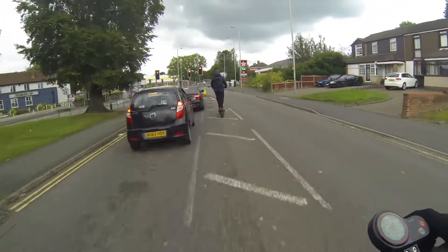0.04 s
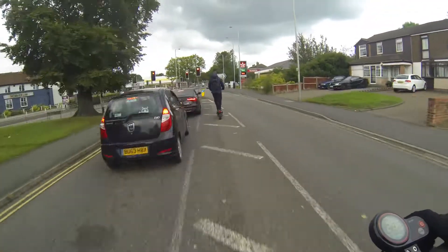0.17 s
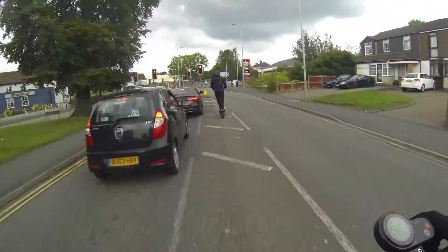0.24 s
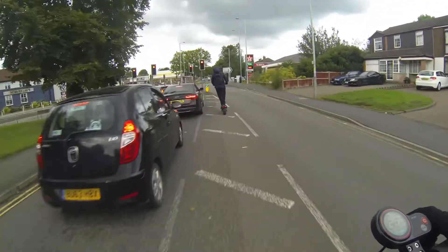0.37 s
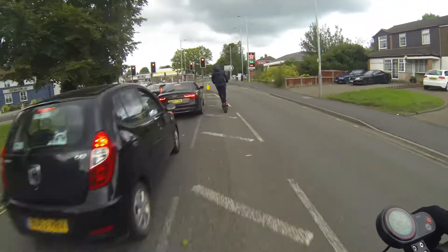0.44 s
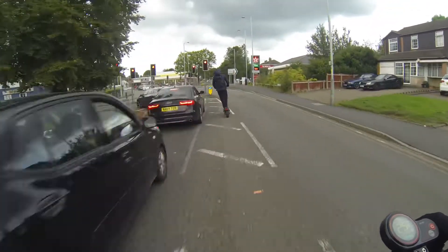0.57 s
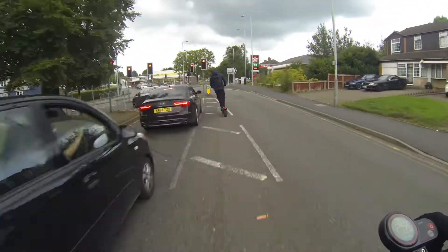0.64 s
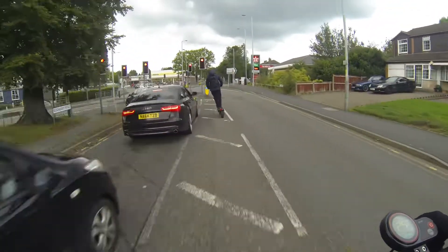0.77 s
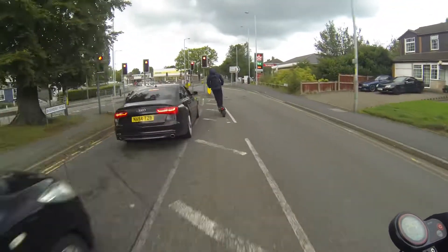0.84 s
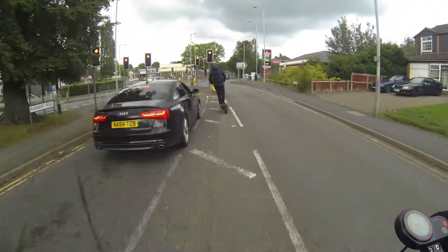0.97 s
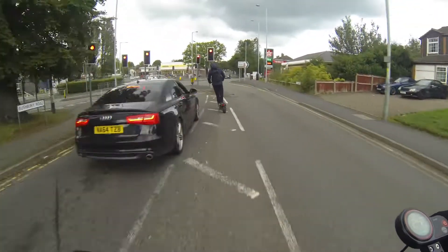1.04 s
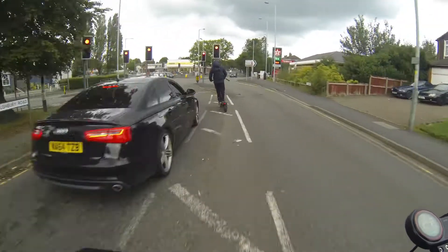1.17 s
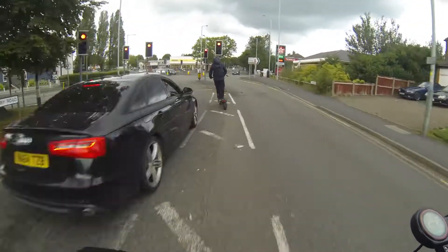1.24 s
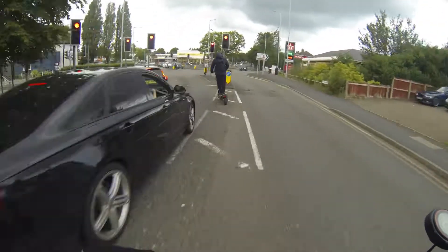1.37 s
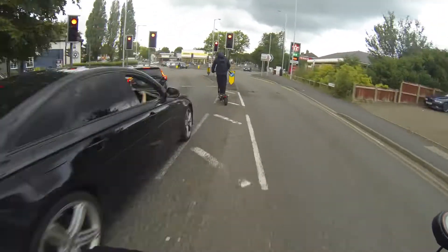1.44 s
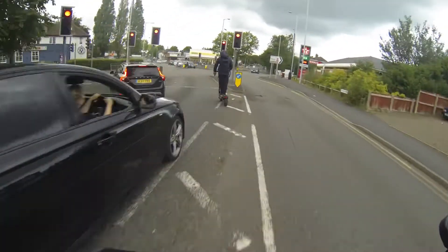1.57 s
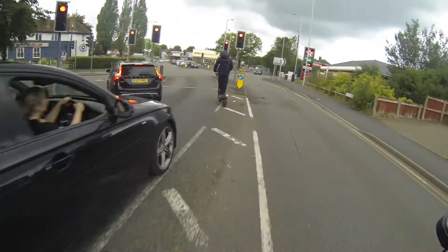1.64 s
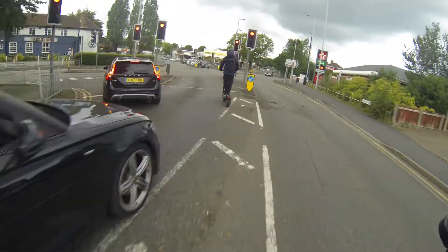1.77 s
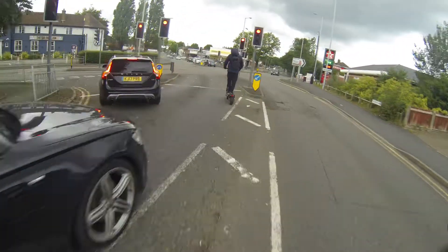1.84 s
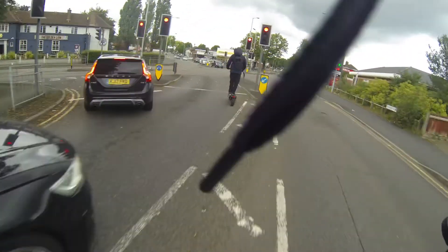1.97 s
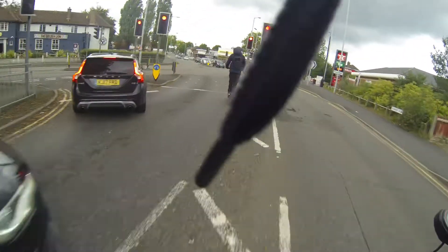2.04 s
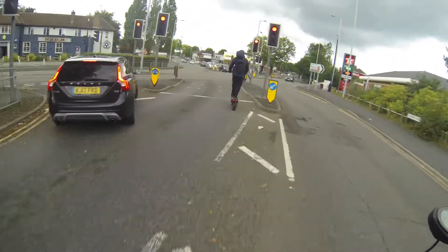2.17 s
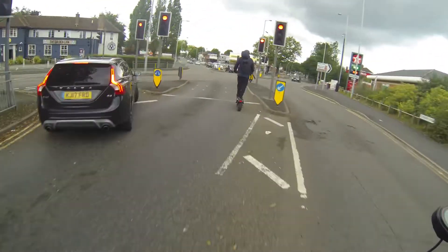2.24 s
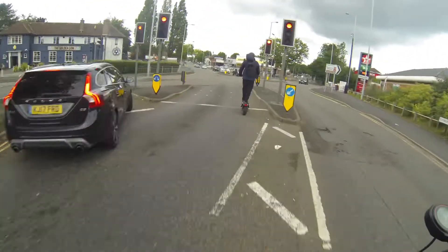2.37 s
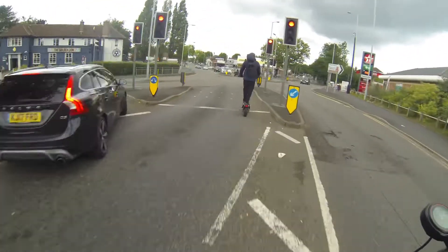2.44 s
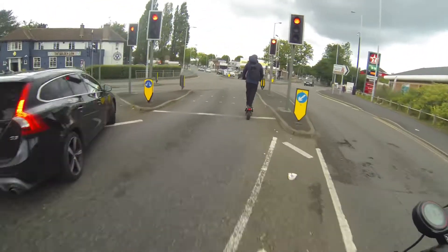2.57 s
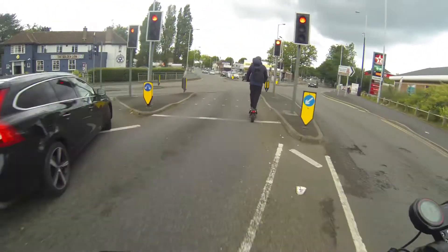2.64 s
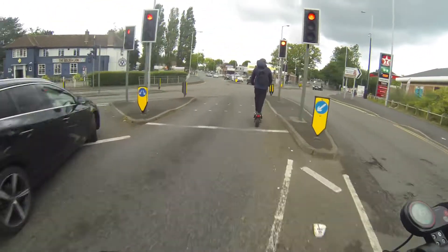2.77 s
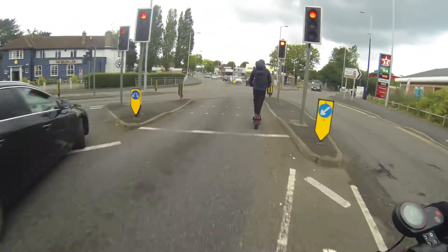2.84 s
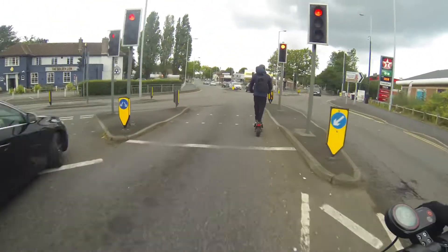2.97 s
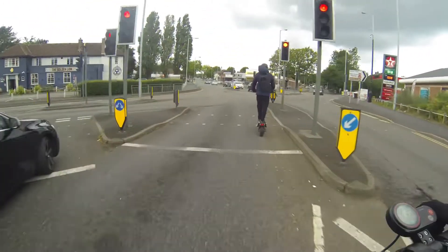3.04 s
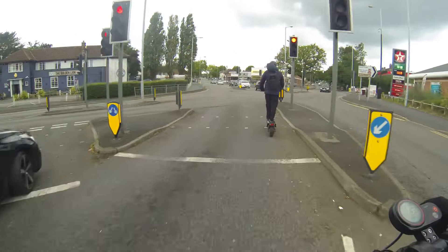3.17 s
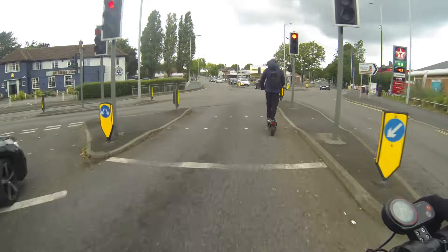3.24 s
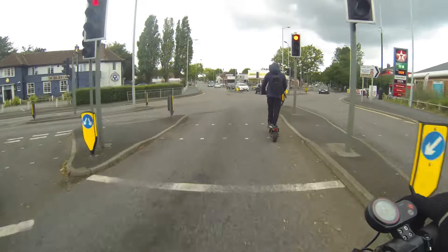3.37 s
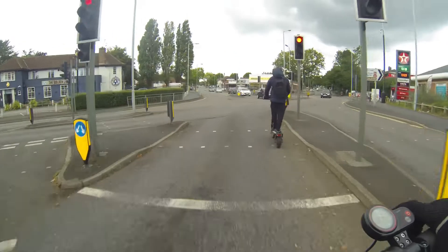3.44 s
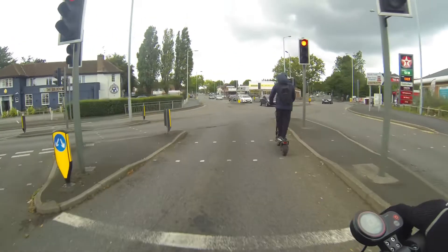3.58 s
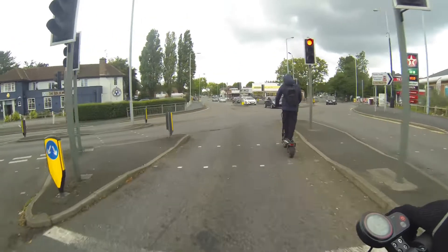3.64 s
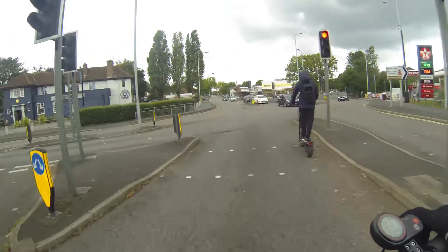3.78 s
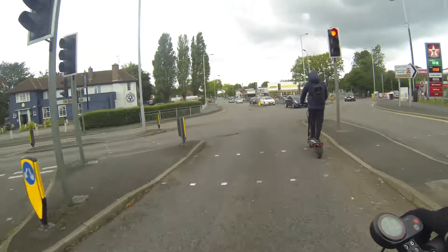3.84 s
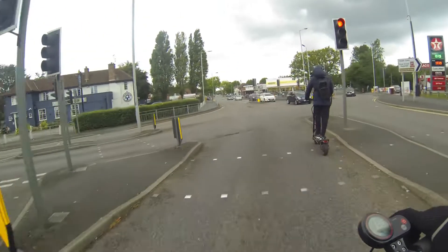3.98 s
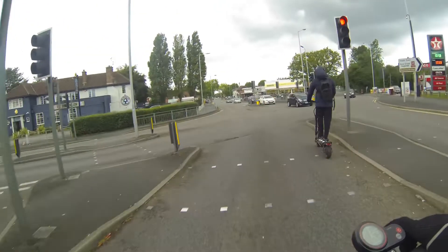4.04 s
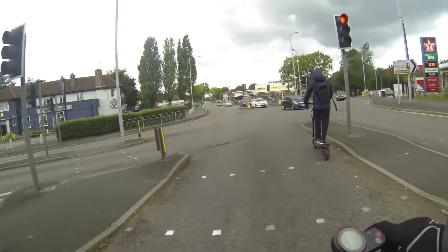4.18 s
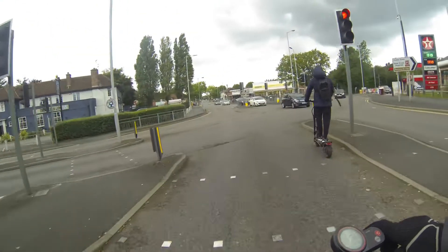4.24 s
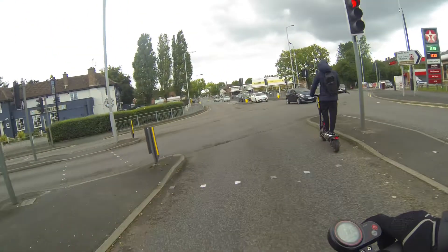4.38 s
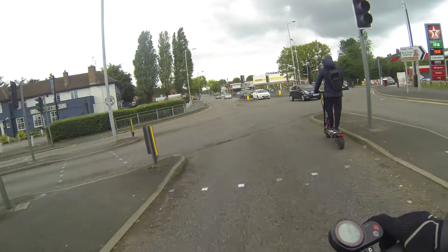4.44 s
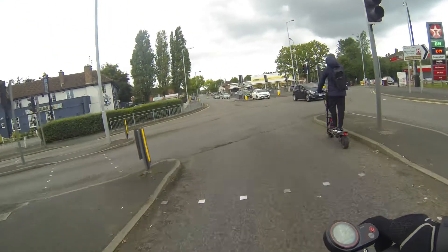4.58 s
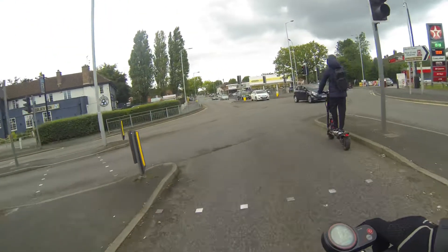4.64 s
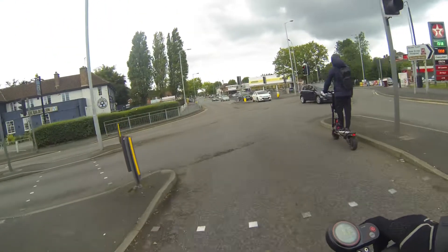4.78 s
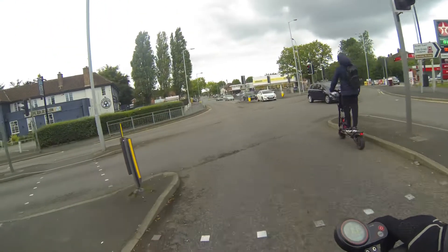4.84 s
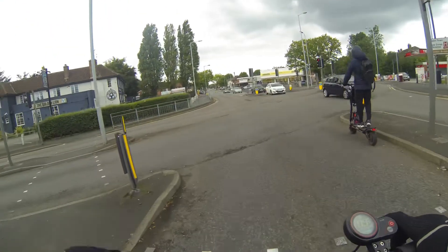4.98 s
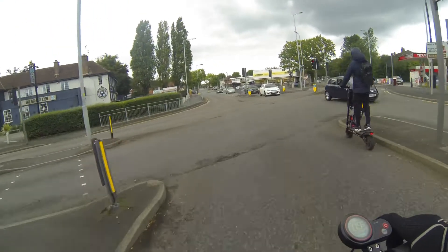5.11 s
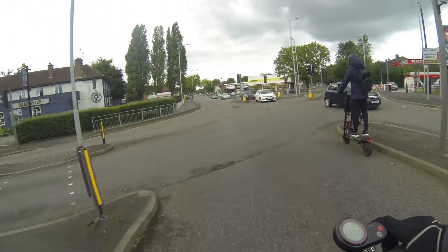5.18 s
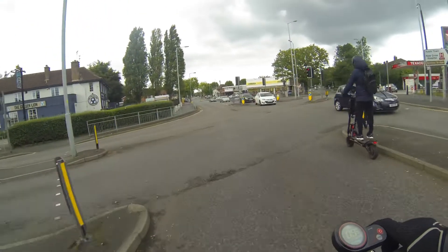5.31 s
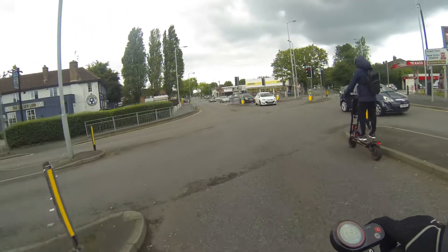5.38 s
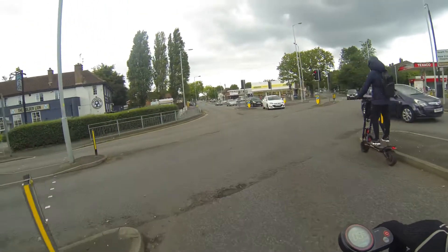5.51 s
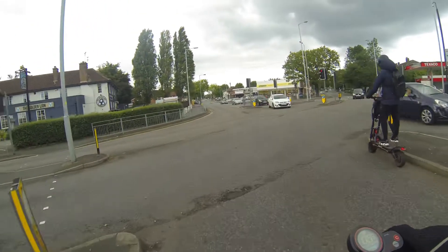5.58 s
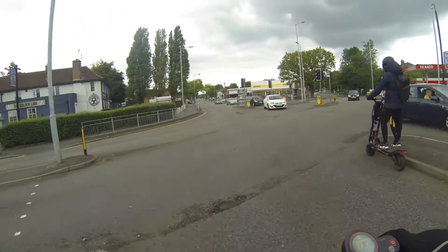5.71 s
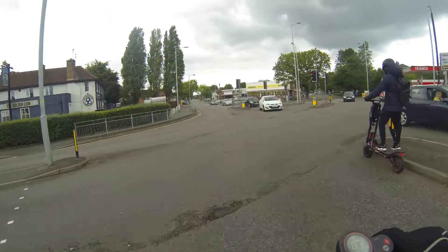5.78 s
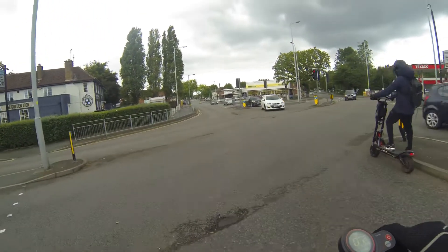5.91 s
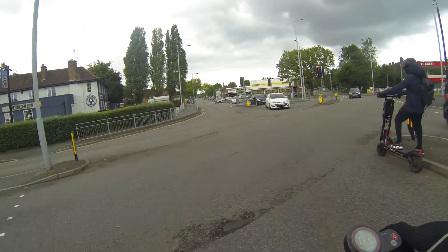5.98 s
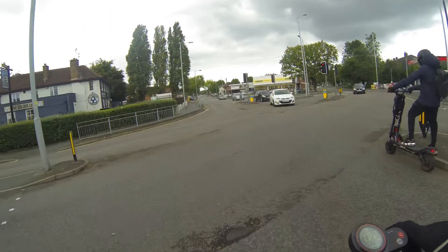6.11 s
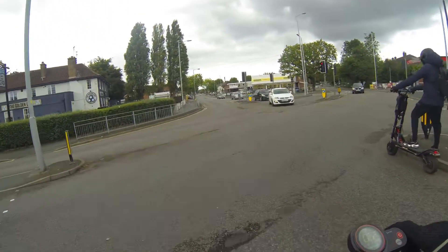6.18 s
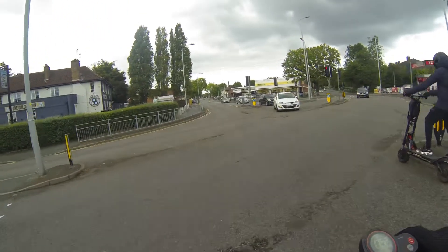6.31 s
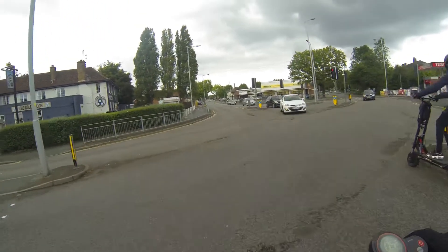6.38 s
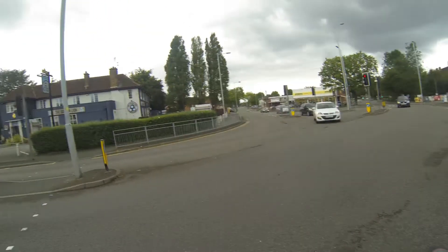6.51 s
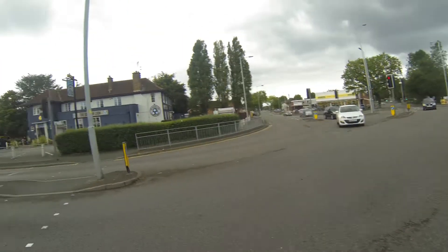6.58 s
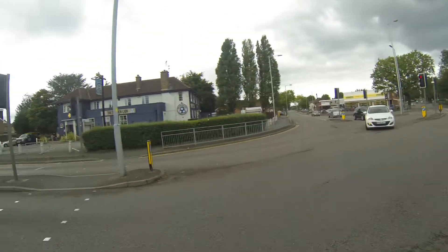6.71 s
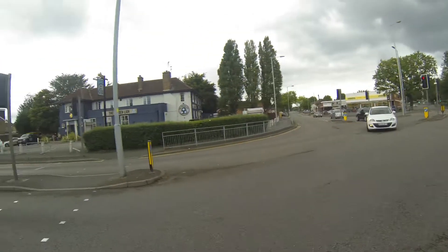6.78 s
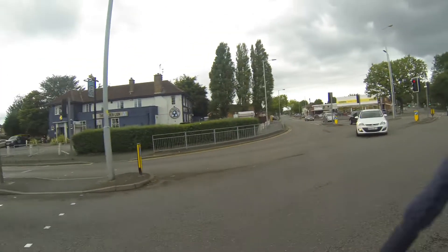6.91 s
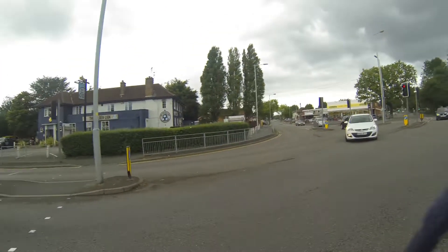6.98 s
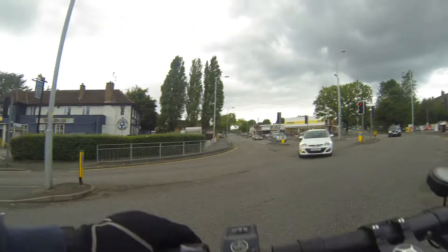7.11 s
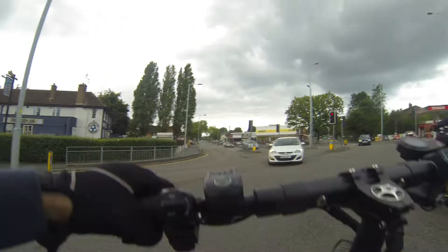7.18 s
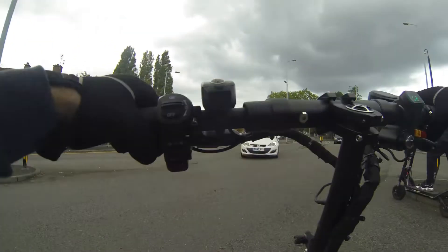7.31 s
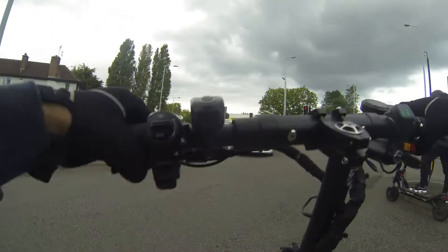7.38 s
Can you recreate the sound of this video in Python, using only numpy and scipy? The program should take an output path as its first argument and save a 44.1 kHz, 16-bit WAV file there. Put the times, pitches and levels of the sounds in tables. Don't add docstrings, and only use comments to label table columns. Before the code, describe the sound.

Outdoors on a road, heard through a closed camera case on a rider's helmet: loud resonant wind first, with hollow plastic pings and low gusts, then a quieter ride as the scooter slows. Grit ticks, bumps thump the mount, cars pass as soft muffled hiss and a thin electronic whistle sits underneath. A sudden burst of rubbing, snapping and heavy knocking closes it.

```python
import sys
import numpy as np
from scipy import signal
from scipy.fft import rfft, irfft, next_fast_len
from scipy.io import wavfile
from scipy.ndimage import uniform_filter1d, map_coordinates

SR = 44100
rng = np.random.default_rng(int(sys.argv[2]) if len(sys.argv) > 2 else 0)


def natural_amplitude(level_db):
    exponent = np.asarray(level_db, float) / 20
    return 10 ** exponent


def unload_audio(sound):
    columns = np.transpose(np.atleast_2d(sound))
    steps = np.round(np.clip(columns, -1, 1) * 32767)
    wavfile.write(sys.argv[1], SR, steps.astype(np.int16))


N = 328104

# [f/Hz, level/dB per Hz]
CIRCUIT_COLOUR = [(2200, -8), (3800, 0.5), (6500, -4), (8000, -14.5), (9200, -7.5), (13300, -6),
                  (13600, -19), (14500, -18), (15200, -28)]
# [overtone of 1 kHz, level/dB rms]
CLOCK_LINES = [(3, -81.5), (4, -100), (8, -110), (11, -113), (12, -106), (13, -104)]
# [start t/s, end t/s, level/dB]
SENSOR_READS = [
    (0, .0170, -68.5),
    (0.0189, 0.036, -67),
]
FRAME_PAIRS_PER_S, FIRST_READ_S = 14.984, .0143

# [f/Hz, width/Hz, level/dB]
SHELL_MODES = [(2370, 850, -8.5), (2614, 106, 2), (3060, 330, -1), (3374, 133, 1.5), (3560, 900, -9),
               (4930, 1100, -15.5), (7000, 1800, -19.5)]
# [t/s, level/dB]
ROLLING_LEVEL = [
    (0, 0.5),
    (3.3, 1),
    (3.8, -2),
    (4.9, -5),
    (5.7, -4),
    (6.5, -5.5),
    (7.44, -3.5),
]
# [t/s, half length/s, hiss rise level/dB, drone rise level/dB]
PASSING_CARS = [
    (0, 0.43, -0.5, 9),
    (.75, 0.19, 1.5, 4.5),
    (1.85, 0.4, 4.5, 3),
    (3.9, 0.54, -0.5, 3),
    (5.8, 0.23, 0.5, 5.5),
    (6.5, 0.37, 1, 5.5),
    (7.44, 0.2, -1, 9.5),
]
HISS_DB, SIZZLE_DB, FAR_DB = -68, -78.5, -69
HISS_FOLLOWS = 0.32
SWISH_S, SWISH_HALF_S, SWISH_DB = 5.6, 0.4, -71.5

# [t/s, peak level/dB, low mode level/dB]
TICK_HITS = [(.6709, -55, 0), (.845, -57, 9), (1.0774, -55, -1), (1.217, -56, 0), (1.8687, -51, -1),
             (2.0637, -54, 6), (2.1141, -50.5, 6), (2.211, -49, -4), (2.794, -49.5, -5), (3.0664, -57, -1),
             (3.1334, -62, 2), (3.1712, -55, 0), (3.4471, -54, 2), (3.8232, -53, 9), (3.893, -58, 0),
             (3.899, -49, -2), (3.906, -55, -2), (4.127, -55.5, -4), (4.254, -53, 1), (4.6453, -55, 2),
             (4.6733, -56, -1), (7.08, -66, 3), (7.2694, -54, -4), (7.2868, -59, 8), (7.314, -56, 2),
             (7.34, -56, 6)]
# [f/Hz, width/Hz, level/dB, group: whole part picks from (fixed, top, low), negative from the end]
BUCKLE_MODES = [(4200, 1700, -8.5, -2), (6170, 1500, -9, -1), (8100, 1100, 9, 1.5), (10300, 1200, 4, 1),
                (12700, 1700, -8, 1), (3420, 260, 8.5, 2.2)]
TICK_T60_S, TICK_HZ = 0.031, 4900
TOP_DB, TOP_DULLS = -11.5, 0.61

# [t/s, peak level/dB, rise/s, fall/s]
STRAP_STROKES = [
    (7.002, -47.5, .1, 0.065),
    (7.076, -36, .004, .012),
    (7.16, -39.5, 0.085, 0.14),
    (7.289, -30.5, 0.023, 0.011),
    (7.4, -42, 0.26, 0.26),
    (6.45, -54.5, 0.39, 0.37),
    (6.65, -56, 0.26, 0.37),
]
RUB_SPAN_DB = 27
# [t/s, peak level/dB, t60/s]
CLASP_SNAPS = [
    (6.987, -44, .04),
    (7.103, -36, 0.025),
    (7.15, -41.5, 0.032),
]
# [f/Hz, width/Hz, level/dB]
CLASP_MODES = [(3270, 1000, 0.5), (5130, 400, 3), (5760, 500, 0), (6550, 250, -3), (7800, 400, -7),
               (8600, 500, -8), (10300, 1100, -13), (12500, 2500, -24)]

# [t/s, peak level/dB, low, middle, upper modes level/dB]
CASE_KNOCKS = [(2.2269, -48, 9, -12, -19), (3.0006, -42, -4, -17, -24), (3.899, -44, -9, -11, -13),
               (4.9447, -42, 1, -1.5, -15), (5.0311, -35, 4.5, 7.5, -13), (5.0404, -55, 5, -5, -7),
               (7.02, -45, 1, -16, -20), (7.075, -37.5, 3.5, -1, 0.5), (7.1042, -37.5, -2.5, -14, -6),
               (7.283, -25.5, 5.5, -2, -16), (7.2908, -52, 10, -13, -7), (7.3404, -16.5, -3, -8.5, -19),
               (7.3845, -26.5, 4, -1.5, -25)]
# [t/s, peak level/dB, note f/Hz]
DOOR_PINGS = [(0.2453, -28, 1384), (1.1652, -32, 1410), (1.2034, -32.5, 1400), (1.4399, -32.5, 1430),
              (2.0963, -45, 1430), (2.187, -33, 1375), (2.353, -35.5, 1350), (2.4114, -37.5, 1470),
              (2.4847, -41, 1350), (4.1984, -40, 1440), (5.0313, -33, 1370)]
# [low, middle, upper level/dB]
PING_WALLS = (-20.5, -45, -34)
# [f/Hz, level/dB, relative t60, group 0 low, 1 middle, 2 upper]
CASE_MODES = [(220, 0, 1.7, 0), (330, -5, 1.1, 0), (430, -5, 1.1, 0), (640, 0, 1.3, 1), (760, 0, 1.1, 1),
              (1000, -12, .7, 1), (1900, 0, .6, 2), (2270, -3, .5, 2), (2950, -5, .4, 2),
              (4600, -14, .3, 2)]
KNOCK_NOTE_HZ = 1456

# [t/s, peak level/dB, f/Hz, first swing up or down]
MOUNT_THUMPS = [(2.227, -20.5, 90, -1), (3.004, -23, 85, -1), (3.217, -26, 30.2, -1), (4.242, -26, 30, -1),
                (4.942, -40, 126, -1), (5.037, -28.5, 60, -1), (5.056, -28, 25, 1), (6.347, -40.5, 120, -1),
                (6.394, -33.5, 160, 1), (6.434, -33, 48, 1), (6.489, -31, 90, 1), (7.021, -32, 60, -1),
                (7.07, -32, 60, -1), (7.11, -31, 23.1, 1), (7.148, -31, 70, 1), (7.16, -20.5, 80, 1),
                (7.269, -15, 105, -1), (7.284, -24, 400, 1), (7.29, -16, 45, 1), (7.34, -28, 326, 1),
                (7.348, -17, 54, -1)]
# [t/s, peak level/dB, f/Hz, t60/s, first swing up or down]
HEAD_LURCH = [
    (7.175, -9.5, 11, .25, -1),
    (7.199, -10, 29, .1, 1),
    (7.215, -7, 23, .17, 1),
]
THUMP_T60_S, THUMP_CYCLES = .06, 1.2

# [t/s, strength level/dB]
WIND_STRENGTH = [(0, 13), (.25, 12), (.76, 9), (.95, 5.5), (1.5, 6.5), (2.03, 2), (2.34, 4), (2.7, 1.5),
                 (4.2, 0.5), (5.1, -1), (6.3, 1), (6.7, 1.5), (7.1, 2), (7.44, 3.5)]
# [t/s, half length/s, rise level/dB]
WIND_GUSTS = [(.14, 0.12, 8.5), (.55, 0.11, 10), (.95, 0.19, 7.5), (1.51, 0.13, 3), (1.97, 0.13, 6),
              (2.34, 0.2, 8), (2.8, 0.21, 7), (3.3, .1, 5), (4.8, 0.13, 11), (5.24, 0.23, 8.5),
              (6.01, 0.094, 6.5), (6.75, .12, 4.5)]
# [t/s, half length/s, rise level/dB]
HELMET_SWAYS = [(.14, 0.058, 8), (.72, 0.29, 4.5), (.9, 0.058, 6), (1.8, 0.13, 7), (2.05, 0.14, 7.5),
                (3.2, 0.34, 3.5), (4.65, 0.046, -1), (4.97, 0.14, 6.5), (5.51, 0.19, 5), (6.46, 0.11, 14),
                (7.3, 0.31, 14)]
# [f/Hz, level/dB per Hz]
BUFFET_COLOUR = [(8, -41), (14, -0.5), (25, -2), (38, -13), (55, -25.5), (75, -34), (150, -120)]
# [f/Hz, level/dB per Hz]
RUMBLE_COLOUR = [(60, -34), (130, -12), (175, -2.5), (225, -0.5), (280, -5), (420, -9), (540, -9.5),
                 (800, -13), (1000, -11.5), (2500, -64)]
# [f/Hz, width/Hz, level/dB]
DRUM_MODES = [(60, 63, -0.5), (90, 21, -3)]
# [f/Hz, width/Hz, level/dB]
CAVITY_MODES = [(732, 24, -9.5), (1003, 118, -4.5), (1214, 230, -1), (1410, 228, 1.5), (1632, 144, -7.5)]
ROAR_DB, RUMBLE_DB, DRUM_DB, BUFFET_DB = -54, -57.5, -57.5, -49
RUMBLE_GROWS, DRUM_GROWS, BUFFET_GROWS = 0.51, 0.77, 0.27
SWAY_RUMBLE = 0.25


def unit(x):
    return x / np.sqrt(np.mean(x ** 2) + 1e-20)


def along(points, hz):
    f, v = np.transpose(points)
    return np.interp(np.log(hz + 1), np.log(f + 1), v)


def colour(points):
    return lambda f: natural_amplitude(along(points, f))


def wobble(rate):
    knots = rng.standard_normal(int(N * rate / SR) + 4)
    return map_coordinates(knots, [np.arange(N) * rate / SR])


def levels(rows):
    s, *cols = np.transpose(rows)
    return [np.interp(np.arange(N) / SR, s, c) for c in cols]


def swells(rows, column=2):
    t = np.arange(N) / SR
    return sum(row[column] * np.exp(-((t - row[0]) / row[1]) ** 2) for row in rows)


def filtered(x, response):
    m = next_fast_len(len(x) + 4096)
    return irfft(rfft(x, m) * response(np.fft.rfftfreq(m, 1 / SR)), m)[:len(x)]


def peak(f, hz, width):
    return (f * width) ** 2 / ((hz * hz - f * f) ** 2 + (f * width) ** 2)


def modes(table):
    return lambda f: np.sqrt(sum((natural_amplitude(db) * peak(f, hz, w)) ** 2 for hz, w, db in table))


def rush(response, patchy_db, lumps_db, rate, grit=0.0):
    z = signal.stft(rng.standard_normal(N), nperseg=512)[2]
    field = uniform_filter1d(rng.standard_normal(z.shape), 5, axis=0)
    field = uniform_filter1d(field, 8, axis=1)
    noise = signal.istft(z * natural_amplitude(patchy_db * unit(field)), nperseg=512)[1][:N]
    jolts = unit((rng.random(N) < .004) * rng.standard_normal(N))
    lumpy = (unit(noise) + grit * jolts) * natural_amplitude(lumps_db * wobble(rate))
    return unit(filtered(lumpy, response))


def electronics():
    t = np.arange(N) / SR
    frame, since = np.divmod(t - FIRST_READ_S, 1 / FRAME_PAIRS_PER_S)
    gate = sum(natural_amplitude(db) * ((since > a) & (since < b)) for a, b, db in SENSOR_READS)
    read = (2 * frame + 2 + (since > SENSOR_READS[1][0])).astype(int)
    line_hz = np.where(since > .0272, 7427, 7480) + 4 * wobble(30)
    phase = 2 * np.pi * (np.cumsum(line_hz) / SR + rng.random(read.max() + 1)[read])
    whistle = uniform_filter1d(gate, size=40) * (np.sin(phase) + natural_amplitude(-5.0) * np.sin(2 * phase))
    lines = sum(natural_amplitude(db + 3) * np.sin(2 * np.pi * 999.89 * k * t) for k, db in CLOCK_LINES)
    burst = np.exp(-((since - .0505) / 0.0023) ** 2) * rng.exponential(size=read.max() + 1)[read]
    busy = natural_amplitude(0.41 * (since > .040)) + 0.34 * burst
    hiss = natural_amplitude(-75.5) * busy * rush(colour(CIRCUIT_COLOUR), 0.63, 0.88, rate=30)
    return whistle + lines + hiss


def swish():
    swell = np.exp(-((np.arange(N) / SR - SWISH_S) / SWISH_HALF_S) ** 2)
    tyres = modes([(3660, 1200, 2), (6600, 1500, -7)])
    return natural_amplitude(SWISH_DB) * swell * rush(tyres, 1.2, .7, rate=20)


def road():
    roll_db, = levels(ROLLING_LEVEL)
    hiss = natural_amplitude(HISS_DB + HISS_FOLLOWS * roll_db + swells(PASSING_CARS))
    hiss = hiss * rush(modes(SHELL_MODES), 1.15, 0.64, rate=30, grit=0.29)
    drone = modes([(1694, 1100, -0.58), (2170, 360, -0.42)])
    far = natural_amplitude(FAR_DB + swells(PASSING_CARS, column=3) - 1.0) * rush(drone, 1.3, 1.3, rate=25, grit=.2)
    vent = modes([(8050, 1100, 0)])
    sizzle = natural_amplitude(SIZZLE_DB + roll_db - 1.5) * rush(vent, 1.1, 1.5, rate=22, grit=.3)
    return hiss + far + sizzle


def ticks():
    out, t = np.zeros(N + SR), np.arange(SR // 12) / SR
    hits = []
    for s, db, low_db in TICK_HITS:
        top_db = TOP_DB - TOP_DULLS * (db + 54)
        note_hz = TICK_HZ * (1 + 0.028 * rng.standard_normal())
        hits.append((s, db, top_db, low_db, TICK_T60_S, note_hz))
    for u, e in zip(rng.random(50), rng.exponential(size=50)):
        hits.append((u * N / SR, -67 + 3 * e, 1.1, 1.1, .02, 5200))
    for s, db, top_db, low_db, t60, note_hz in hits:
        group_db = (0, top_db, low_db)
        table = [(note_hz, 1000, 0)] + [(hz, w, d + group_db[int(g)]) for hz, w, d, g in BUCKLE_MODES]
        puff = unit(filtered(rng.standard_normal(len(t)), modes(table)))
        onset = 1 - np.exp(-t / 0.00056)
        out[round(s * SR):][:len(t)] += natural_amplitude(db - 1.5 - 60 * t / t60) * onset * puff
    return out[:N]


def rub():
    t = np.arange(N) / SR
    strokes = 0
    for s, db, rise, fall in STRAP_STROKES:
        strokes = strokes + natural_amplitude(db - RUB_SPAN_DB * np.maximum((s - t) / rise, (t - s) / fall))
    strap = modes([(290, 340, 12), (1010, 760, 4.7), (1550, 530, 6.5), (2050, 740, 2.5)])
    return strokes * natural_amplitude(-4.0) * rush(strap, 2.5, 2.6, rate=79, grit=1.0)


def snaps():
    out, t = np.zeros(N + SR), np.arange(SR // 12) / SR
    for s, db, t60 in CLASP_SNAPS:
        crack = unit(filtered(rng.standard_normal(len(t)), modes(CLASP_MODES)))
        onset = 1 - np.exp(-t / 0.0011)
        out[round(s * SR):][:len(t)] += natural_amplitude(db - 3.5 - 60 * t / t60) * onset * crack
    return out[:N]


def knocks():
    out, t = np.zeros(N + SR), np.arange(SR // 8) / SR
    hits = [(*row, *PING_WALLS) for row in DOOR_PINGS]
    hits += [(s, db, KNOCK_NOTE_HZ, *walls) for s, db, *walls in CASE_KNOCKS]
    for s, db, note_hz, *group_db in hits:
        table = [(note_hz, 0, .035)]  # Hz, dB, t60 s
        table += [(hz, level + group_db[int(g)], share * 0.032) for hz, level, share, g in CASE_MODES]
        ring = 0
        for hz, level, t60 in table:
            ring = ring + natural_amplitude(level + rng.normal(0, 1.0) - 60 * t / t60) * np.sin(2 * np.pi * hz * t)
        blurred = modes([(hz, 60 + 0.33 * hz, level) for hz, level, _ in table])
        rattle = unit(filtered(rng.standard_normal(len(t)), blurred))
        rattle = rattle * natural_amplitude(max(0, *group_db) - 18.5 - 60 * t / 0.04)
        onset = (1 - np.exp(-t / 0.0005)) ** 2
        out[round(s * SR):][:len(t)] += natural_amplitude(db) * onset * (ring + rattle)
    return out[:N]


def thumps():
    out, t = np.zeros(N + SR), np.arange(SR // 3) / SR
    bumps = [(s, db, hz, THUMP_T60_S + THUMP_CYCLES / hz, sign) for s, db, hz, sign in MOUNT_THUMPS]
    for s, db, hz, t60, sign in bumps + list(HEAD_LURCH):
        swing = np.sin(2 * np.pi * hz * (t + .004 * (1 - np.exp(-t / .003))))
        onset = 1 - np.exp(-t * hz / 0.084)
        out[round(s * SR):][:len(t)] += np.sign(sign) * natural_amplitude(db - 2.5 - 60 * t / t60) * onset * swing
    return out[:N]


def wind():
    air_db, sway_db = levels(WIND_STRENGTH)[0], swells(HELMET_SWAYS)
    gust = wobble(22)
    buffet = natural_amplitude(BUFFET_DB + BUFFET_GROWS * air_db + swells(WIND_GUSTS))
    buffet = buffet * rush(colour(BUFFET_COLOUR), 0.94, 0.2, rate=4.2)
    drum = natural_amplitude(DRUM_DB + DRUM_GROWS * air_db + sway_db + 3.0 + 0.73 * gust)
    drum = drum * rush(modes(DRUM_MODES), 1.35, 3.3, rate=25)
    rumble = natural_amplitude(RUMBLE_DB + RUMBLE_GROWS * air_db + SWAY_RUMBLE * sway_db + 0.78 * gust)
    rumble = rumble * rush(colour(RUMBLE_COLOUR), 0.36, 1.0, rate=30, grit=0.35)
    roar = natural_amplitude(ROAR_DB + air_db + 1.0 * gust)
    roar = roar * rush(modes(CAVITY_MODES), 0.28, 0.84, rate=50, grit=0.31)
    return buffet + drum + rumble + roar


def scene():
    bed = electronics() + swish() + road()
    contacts = ticks() + rub() + snaps() + knocks()
    return (bed + contacts + thumps() + wind())[None]


def band_limit(x):
    return signal.sosfilt(signal.butter(12, 15150, fs=SR, output="sos"), x)


def record(dry):
    return band_limit(dry)


dry = scene()
out = record(dry)
unload_audio(out)
```